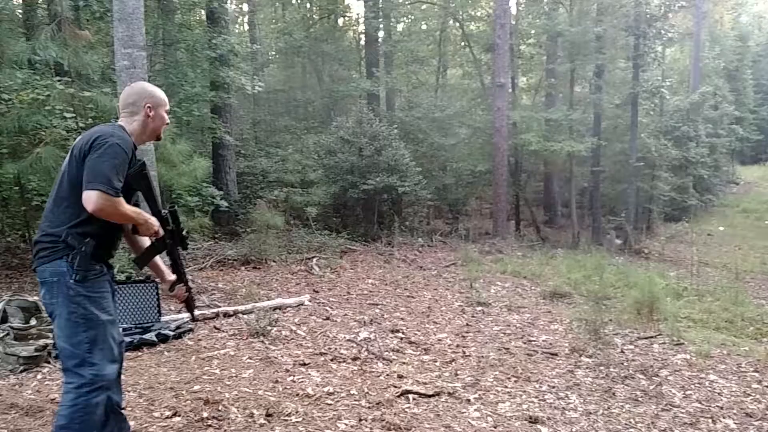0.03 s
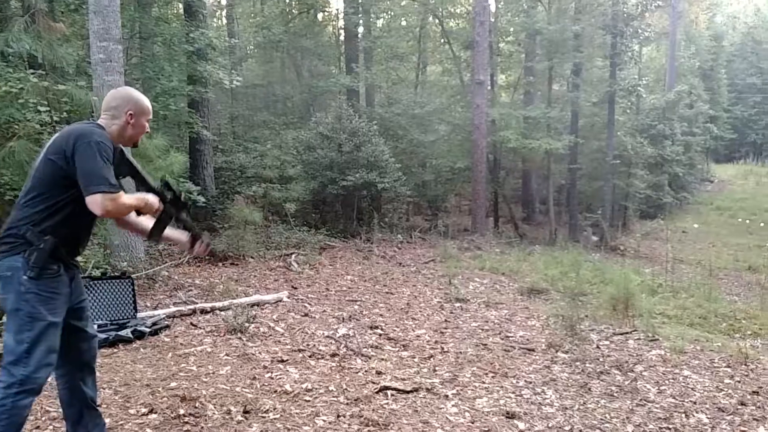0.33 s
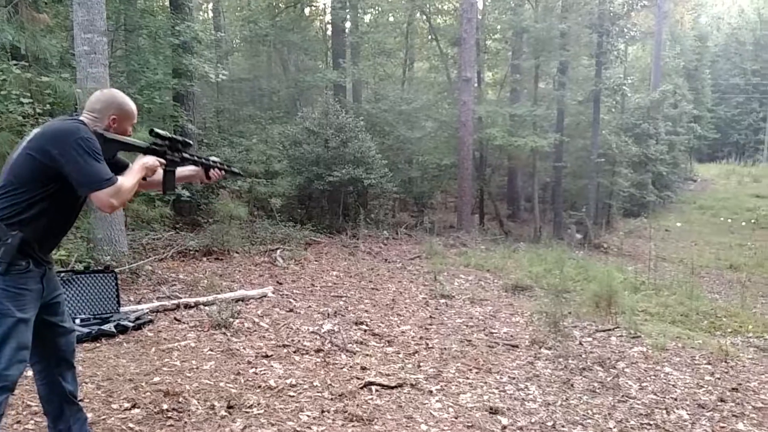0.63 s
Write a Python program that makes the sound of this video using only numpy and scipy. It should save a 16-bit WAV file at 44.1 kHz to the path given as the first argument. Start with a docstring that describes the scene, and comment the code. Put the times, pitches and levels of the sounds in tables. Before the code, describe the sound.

Rapid rifle shots ring out a few steps from the microphone at a wood's edge. At first, faint insects sing, with soft footfalls around 0.3 seconds and light metal handling clicks near 0.6 and 0.8. The first shot cracks at 1.9 seconds. From 2.2 to 3.8, eleven more follow evenly, about six a second, each a sharp, booming blast that overloads the microphone and echoes through the trees.

```python
"""Rifle at the edge of a wood

Twelve shots, fired a few steps from a small camera's microphone. Insects sing in still air; the rifle clicks in
the hands and the shooter settles his stance. Each muzzle blast, a crack, a boom and a push of air, overloads
the microphone. The ground and single trunks throw it back in a fixed pattern, and the wood rolls on."""
import sys
import numpy as np
from scipy import signal
from scipy.fft import rfft, irfft
from scipy.io import wavfile

SR = 44100
rng = np.random.default_rng(int(sys.argv[2]) if len(sys.argv) > 2 else 0)


def dump(signal):
    """Clip the signal to [-1, 1] and save it as 16-bit WAV at the path in sys.argv[1]."""
    limited = np.clip(np.atleast_2d(signal).T, -1, 1)
    pcm = np.round(limited * 32767).astype(np.int16)
    wavfile.write(sys.argv[1], SR, pcm)


N = 176400

# the shots and their relative strengths (time [s], crack [dB], boom [dB], push [dB], echo [dB])
SHOTS = [(1.8825, 0, -0.5, 13, 0.5), (2.204, -2, -3, 4, 0.5), (2.3675, -2, 1, 3.5, 1),
         (2.5322, -1.5, -1.5, 7, 0.5), (2.6984, -2, -2, 5, 0.5), (2.8652, -2.5, -4, -12, -1),
         (3.0261, -2, 0.5, -7, 0.5), (3.1935, -1.5, -3.5, 4, 0.5), (3.3505, -1.5, 3, 0, 0),
         (3.5145, -2, -0.5, -1, 1), (3.6768, -2, -0.5, 3, 1), (3.8335, -2, -3, -3, 0.5)]


def amp(db):
    """Decibels to gain."""
    return 10 ** (np.asarray(db) / 20)


def unit(x):
    """Scales to rms 1."""
    return x / np.sqrt(np.mean(x ** 2) + 1e-20)


def read(points, hz, column=1):
    """Reads one column of a table on a log-frequency axis."""
    table = np.array(points, float)
    return np.interp(np.log(hz + 1), np.log(table[:, 0] + 1), table[:, column])


def add(mix, start_s, sound):
    """Mixes a sound in at a time."""
    part = mix[max(round(start_s * SR), 0):][:len(sound)]
    part += sound[:len(part)]


def noise(spectrum, size):
    """Noise of rms 1 with the given spectral shape."""
    hz = np.fft.rfftfreq(size, 1 / SR)
    phases = np.exp(2j * np.pi * rng.random(len(hz)))
    return unit(irfft(amp(read(spectrum, hz)) * phases, size))


def drift(rate_hz, size):
    """Smooth random motion of rms 1."""
    hz = np.fft.rfftfreq(size, 1 / SR)
    smoothing = np.exp(-(hz / rate_hz) ** 2) * (hz > 0)
    return unit(irfft(rfft(rng.standard_normal(size)) * smoothing, size))


def burst(t, rise_s, hold_s, fall_s):
    """Envelope: a linear rise, then an exponential fall from hold_s on."""
    return np.minimum(t / rise_s, 1) * np.exp(-np.maximum(t - hold_s, 0) / fall_s)


def shot_noises(spectrum, alike, size):
    """One noise per shot: a part common to all, since nothing moves, and a fresh part if alike < 1."""
    common = noise(spectrum, size)
    return [alike * common + np.sqrt(1 - alike ** 2) * noise(spectrum, size) for _ in SHOTS]


def air():
    """Still air and distant rumble."""
    # spectrum of the air (frequency [Hz], level [dB])
    spectrum = [(15, 11.5), (40, -8), (100, -2.5), (220, 1.5), (350, -7.5), (600, -15), (1500, -28),
                (4000, -22), (10000, -38.5), (15000, -37)]
    return amp(-54) * noise(spectrum, N)


def insects():
    """A steady far chorus, with a few crickets trilling nearer the microphone."""
    # spectrum of the chorus (frequency [Hz], level [dB])
    chorus = [(2000, -18), (2600, -15.5), (3100, 1.5), (3800, -3), (4600, -8.5), (5500, -7), (6500, -21.5),
              (7900, -23), (8600, -34), (15000, -45)]
    # cricket trills (start [s], length [s], pitch [Hz], level [dB], pitch wander [Hz])
    trills = [(0.409, 0.17, 3085, -52.5, 5.7), (0.874, 0.21, 3740, -56, 20), (1.15, 0.198, 3070, -51, 6.6),
              (1.68, 0.24, 3920, -56, 140)]
    out = amp(-49.5 + 0.44 * drift(60, N)) * noise(chorus, N)
    for start, length, hz, db, wander_hz in trills:
        t = np.arange(0, length, 1 / SR)
        phase = 2 * np.pi * np.cumsum(hz + wander_hz * drift(90, len(t))) / SR
        swell = np.sin(np.pi * t / length)
        roughness = 1 + 0.13 * drift(60, len(t))
        add(out, start, amp(db) * unit(swell * roughness * np.sin(phase)))
    return out


def stance():
    """Dull thuds on the leaf litter as the shooter settles his feet."""
    # footfalls (time [s], level [dB])
    thuds = [(.27, -47), (.329, -50)]
    # spectrum of a thud (frequency [Hz], level [dB])
    spectrum = [(50, -10), (170, -4), (280, 0), (500, -22), (1500, -22), (5000, -45)]
    out, t = np.zeros(N), np.arange(0, .08, 1 / SR)
    envelope = burst(t, rise_s=.003, hold_s=.003, fall_s=.022)
    for start, db in thuds:
        add(out, start, amp(db) * envelope * noise(spectrum, len(t)))
    return out


def rifle_action():
    """Small metal sounds: the rifle clicks in the hands, and the hammer falls just before each blast."""
    # handling clicks (time [s], level [dB])
    clicks = [(.2687, -48), (0.6215, -34), (0.776, -37), (1.4814, -52.5), (1.6301, -54), (1.8216, -50)]
    # ring of the metal (frequency [Hz], level [dB])
    click_ring = [(200, -1), (800, -17), (1300, -1.5), (1750, 0.5), (2100, -20), (2500, 3.5), (3200, 0),
                  (4500, -20), (10000, -42)]
    out, t = np.zeros(N), np.arange(0, .06, 1 / SR)
    click_shape = burst(t, rise_s=.0014, hold_s=0, fall_s=.0054)
    for start, db in clicks:
        add(out, start, amp(db) * click_shape * noise(click_ring, len(t)))
    hammer_hz, lead_s, fall_s = 3180, .0076, .0019
    for start, *_ in SHOTS:
        ring = unit(drift(1350, len(t)) * np.sin(2 * np.pi * hammer_hz * t))
        add(out, start - lead_s, amp(-28.5) * np.exp(-t / fall_s) * ring)
    return out


def wood():
    """Countless far trunks and leaves return a roll, lumpy below and smooth above; the mids last longest."""
    # roll of the wood (frequency [Hz], level [dB], time to fall 60 dB [s])
    reverb = [(27.8, -15, 0.34), (130, -0.5, 0.5), (261, -10.5, 1.48), (414, 1.5, 1.04), (585, 4, 1.5),
              (940, -0.5, 1.22), (1700, -5, 1.05), (2600, -4.5, 1.02), (3260, 1.5, 0.91),
              (3900, -9.5, 0.89), (6420, -22, 0.69), (8000, -29, 0.79), (10500, -33, 0.69),
              (15500, -40, .5)]
    out, t = np.zeros(N), np.arange(SR * 2) / SR
    rise = np.minimum(t / .024, 1)
    lumps = amp(1.1 * drift(113, len(t)))
    low_pass = signal.butter(2, 2470, fs=SR, output="sos")
    for (start, *_, echo_db), scatter in zip(SHOTS, shot_noises(reverb, alike=.88, size=len(t))):
        hz, age, bands = signal.stft(scatter, SR, nperseg=512)
        t60 = read(reverb, hz, column=2)[:, None]
        fade = np.exp(-np.log(1000) * age / t60)
        roll = signal.istft(bands * fade, SR)[1][:len(t)]
        low = signal.sosfiltfilt(low_pass, roll)
        high = roll - low
        add(out, start, amp(-15.5 + echo_db) * rise * (lumps * low + high))
    return out


def reflections():
    """The ground, single trunks and the tree line return every shot as the same row of short, dulled pulses."""
    # reflections (delay [s], peak level [dB], low edge [Hz], high edge [Hz])
    echoes = [(.0048, 2.5, 191, 830), (.0262, 4.5, 330, 1280), (0.0282, -10, 129, 900),
              (.056, -7, 463, 1560), (0.0676, -3, 500, 2380), (0.0688, -4.5, 426, 1390),
              (.0904, -6.5, 376, 1100), (.1093, -9.5, 480, 1300), (.1143, -6.5, 444, 656),
              (.136, -14.5, 450, 800), (.147, -30.5, 452, 830), (.176, -16.5, 427, 736),
              (.215, -18.5, 417, 650), (.249, -12, 463, 710)]
    out = np.zeros(N)
    low_pass = signal.butter(2, 3870, fs=SR, output="sos")
    pulse = signal.sosfilt(low_pass, signal.unit_impulse(1024))
    for delay, db, low_hz, high_hz in echoes:
        band = signal.butter(2, [low_hz, high_hz], "band", fs=SR, output="sos")
        echo = signal.sosfilt(band, pulse)
        for start, *_, echo_db in SHOTS:
            add(out, start + delay, amp(db + echo_db) * echo / abs(echo).max())
    return out


def gas_pushes():
    """The gas cloud of each shot pushes the air, then sucks it back."""
    delay_s, rise_s, push_s = .0065, .0013, .00157
    out, t = np.zeros(N), np.arange(0, .06, 1 / SR)
    wave = np.minimum(t / rise_s, 1) * (1 - t / push_s) * np.exp(-t / push_s)
    for start, _, _, push_db, _ in SHOTS:
        add(out, start + delay_s, amp(push_db - 2) * wave)
    return signal.sosfilt(signal.butter(2, 75, "high", fs=SR, output="sos"), out)


def muzzle_blasts():
    """Each shot from a few steps away: a sharp crack, its scatter from nearby brush, and a short boom."""
    # muzzle crack (frequency [Hz], level [dB])
    crack_spectrum = [(100, -23.5), (500, -2), (1050, -10.5), (2100, -8.5), (2850, -5), (3200, 0),
                      (3550, -7), (4100, -12), (5400, -15), (7500, -32), (10500, -27), (15500, -42)]
    # scatter from the ground and the nearest brush (frequency [Hz], level [dB])
    brush_spectrum = [(150, -2), (380, 3), (700, -3.5), (850, -1.5), (1000, 0.5), (1200, -3), (1550, -4),
                      (2100, -7), (3300, -3.5), (4200, -20.5), (7000, -27), (10500, -38.5), (15500, -40)]
    # boom of the muzzle gas (frequency [Hz], level [dB])
    boom_spectrum = [(20, -25), (50, -16), (105, -0.5), (200, -1), (350, -3.5), (500, -9.5), (900, -16),
                     (3000, -57)]
    out, t = np.zeros(N), np.arange(0, .15, 1 / SR)
    cracks = shot_noises(crack_spectrum, alike=1, size=700)
    brushes = shot_noises(brush_spectrum, alike=.95, size=1600)
    booms = shot_noises(boom_spectrum, alike=.6, size=1800)
    crack_shape = amp(1.5) * np.exp(-t / .0058)
    brush_shape = amp(-3.5) * np.exp(-t / .03) * burst(t, rise_s=.005, hold_s=.029, fall_s=.0025)
    boom_shape = amp(-11) * burst(t, rise_s=.0031, hold_s=.027, fall_s=.003)
    for (start, crack_db, boom_db, _, _), crack, brush, boom in zip(SHOTS, cracks, brushes, booms):
        # each short noise loops under its envelope
        add(out, start, amp(crack_db) * crack_shape * np.resize(crack, len(t)))
        add(out, start, amp(crack_db) * brush_shape * np.resize(brush, len(t)))
        add(out, start, amp(boom_db) * boom_shape * np.resize(boom, len(t)))
    return out


def scene():
    """Rifle, echoes, shooter, insects and air as they reach the one microphone."""
    rifle = muzzle_blasts() + gas_pushes() + reflections() + wood() + rifle_action()
    return (rifle + stance() + insects() + air())[None]


def record(dry):
    """The camera fades in, flattens the peaks of the blasts and cuts the top treble."""
    open_s, fade_s, knee, top_hz = .1, .13, 8.2, 15600
    faded = dry * np.clip((np.arange(N) / SR - open_s) / fade_s, 0, 1)
    clipped = faded / (1 + abs(faded) ** knee) ** (1 / knee)
    low_pass = signal.firwin(255, top_hz, window=("kaiser", 8), fs=SR)
    return signal.oaconvolve(clipped, low_pass[None], "same")


dry = scene()
out = record(dry)
dump(out)
```